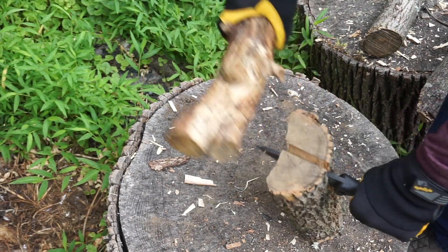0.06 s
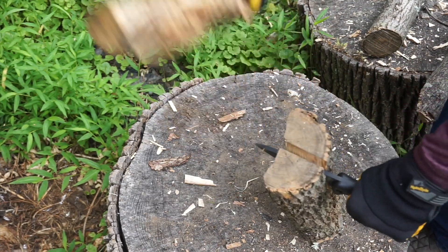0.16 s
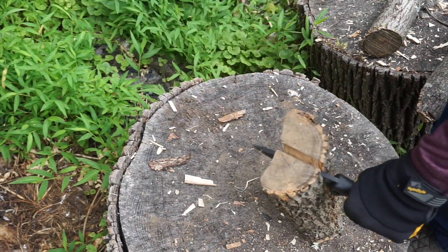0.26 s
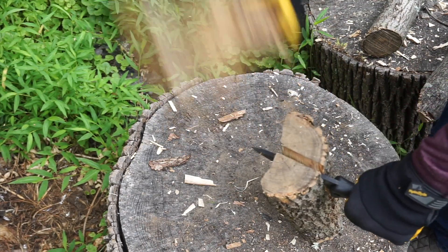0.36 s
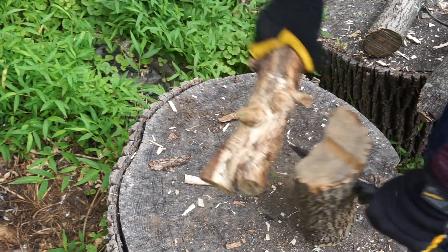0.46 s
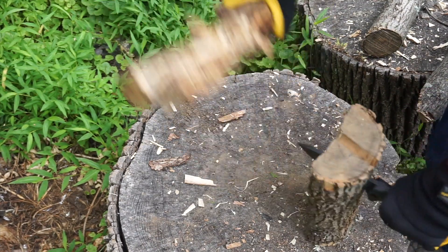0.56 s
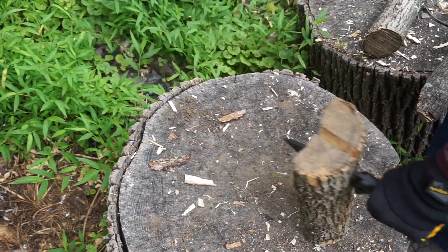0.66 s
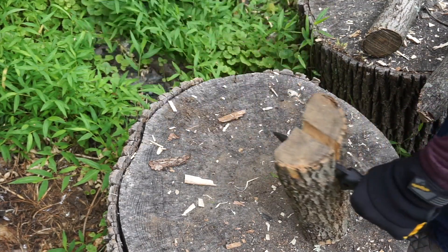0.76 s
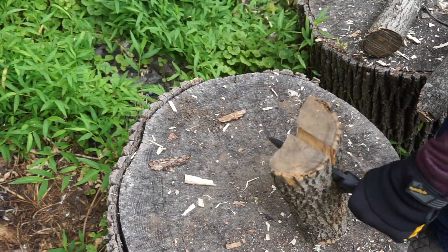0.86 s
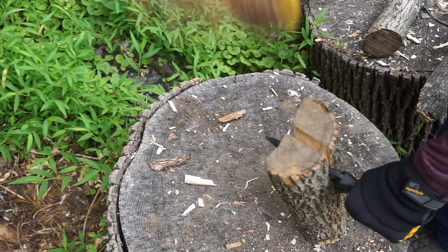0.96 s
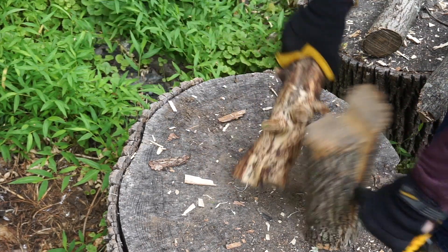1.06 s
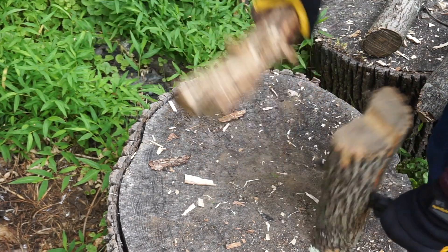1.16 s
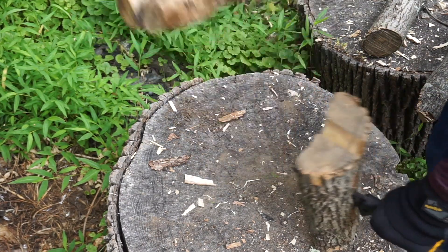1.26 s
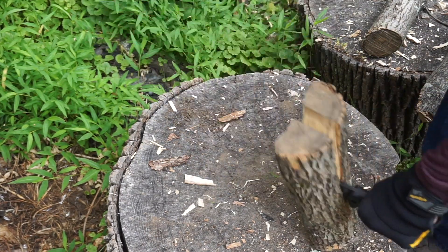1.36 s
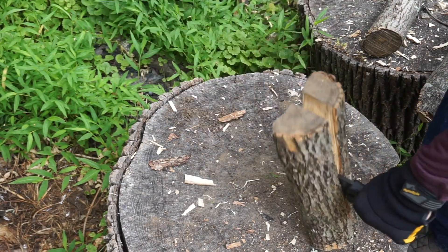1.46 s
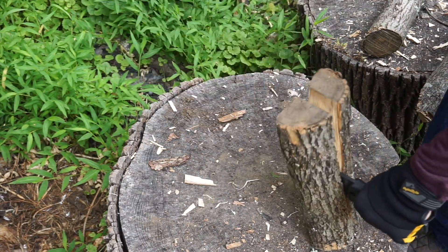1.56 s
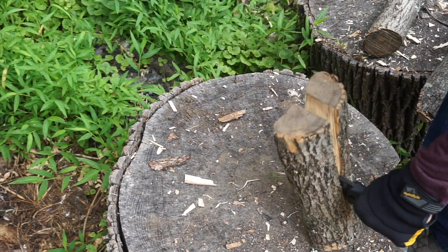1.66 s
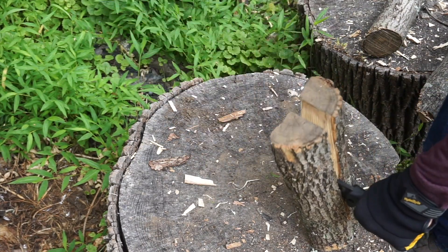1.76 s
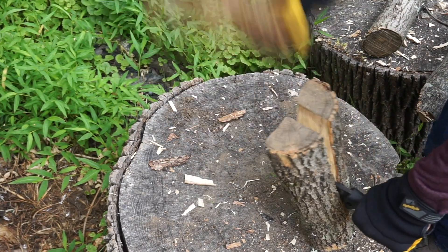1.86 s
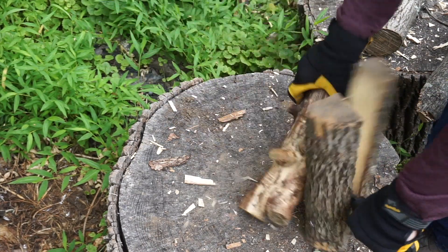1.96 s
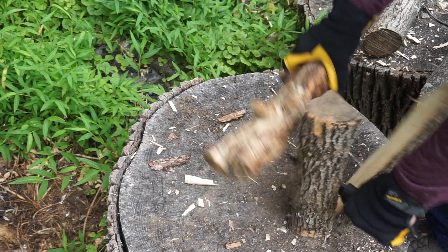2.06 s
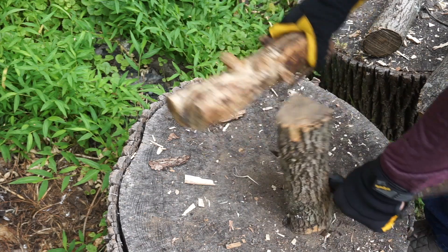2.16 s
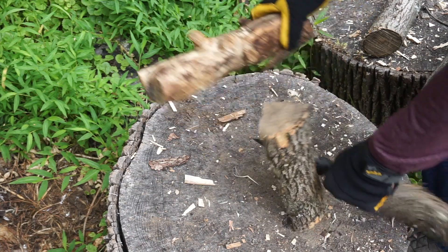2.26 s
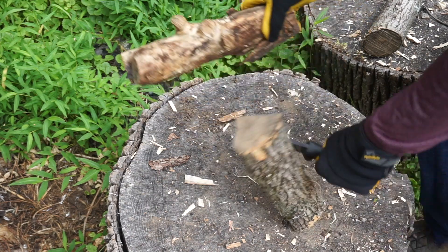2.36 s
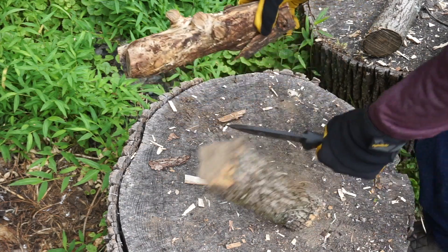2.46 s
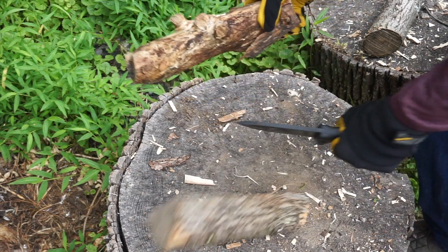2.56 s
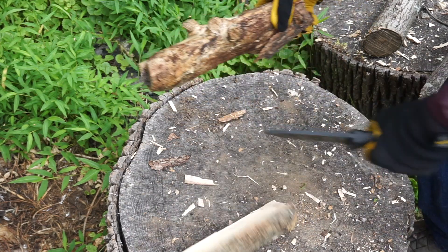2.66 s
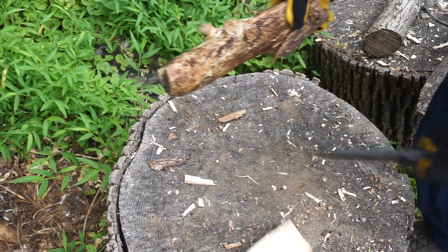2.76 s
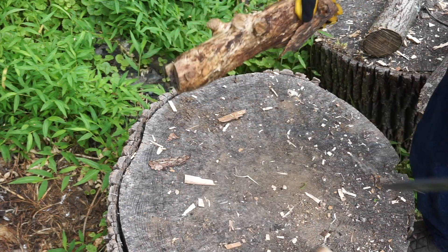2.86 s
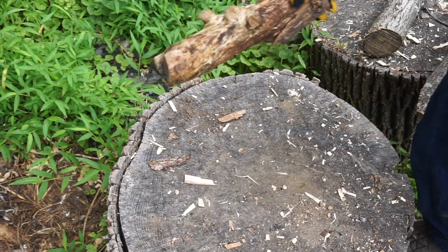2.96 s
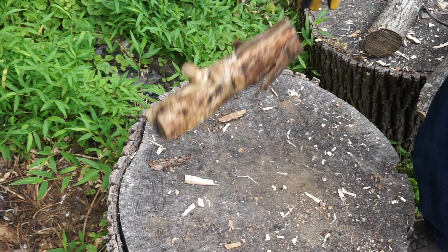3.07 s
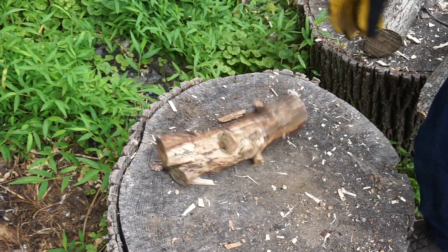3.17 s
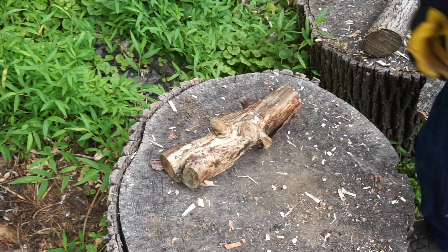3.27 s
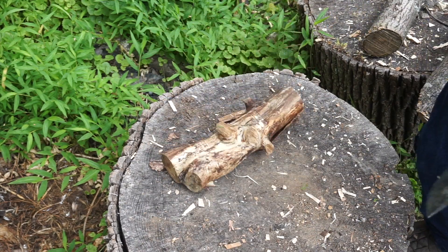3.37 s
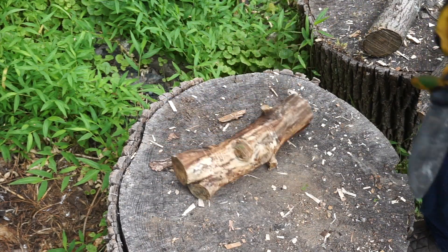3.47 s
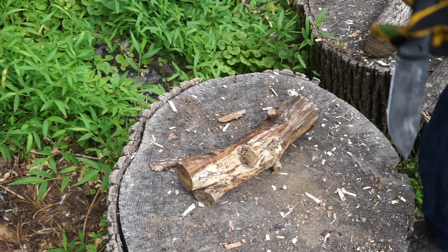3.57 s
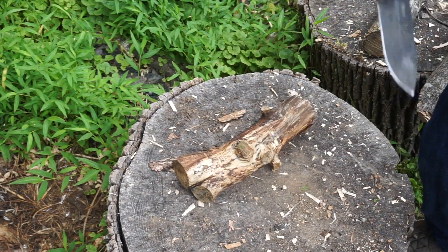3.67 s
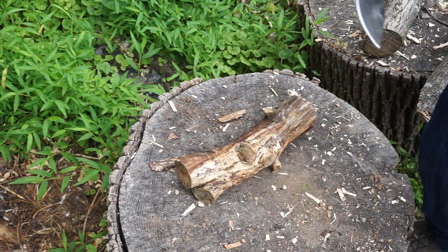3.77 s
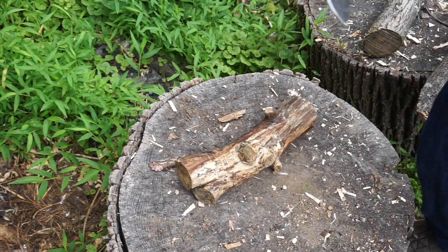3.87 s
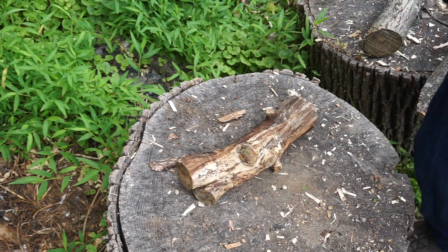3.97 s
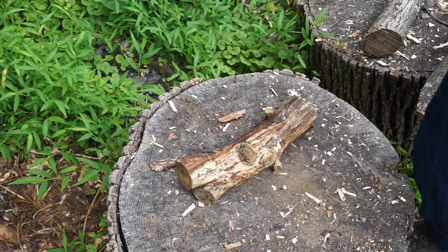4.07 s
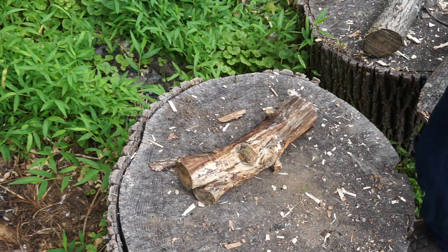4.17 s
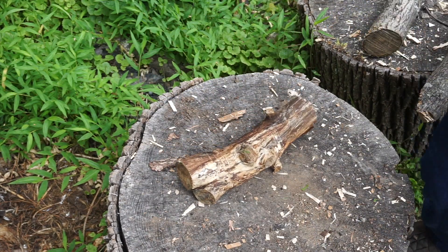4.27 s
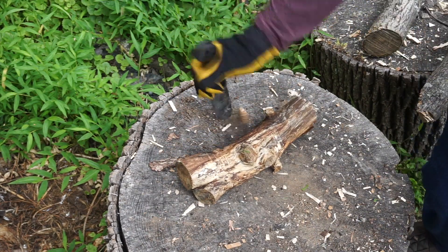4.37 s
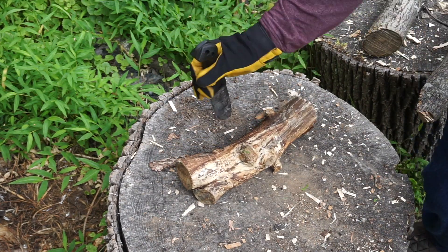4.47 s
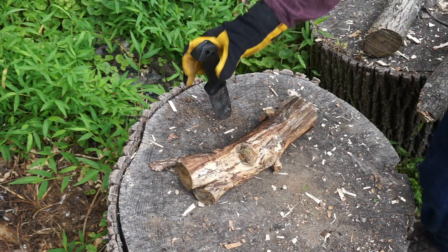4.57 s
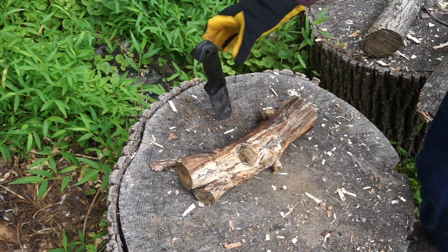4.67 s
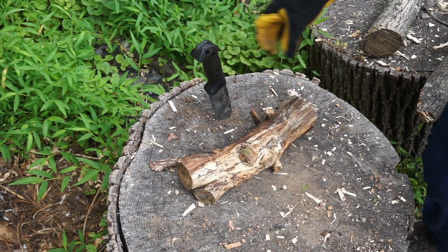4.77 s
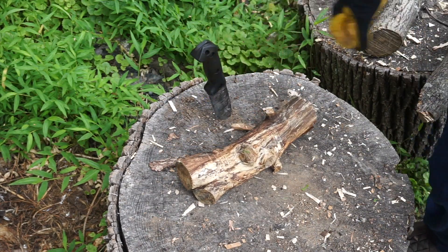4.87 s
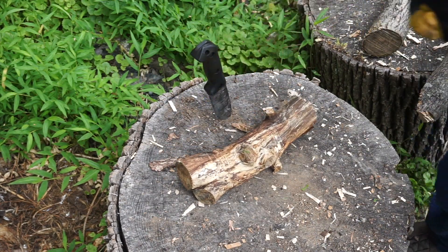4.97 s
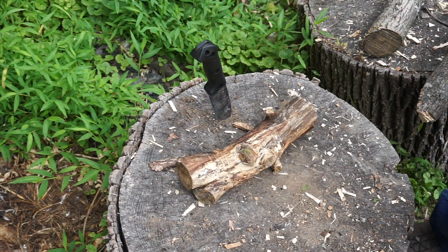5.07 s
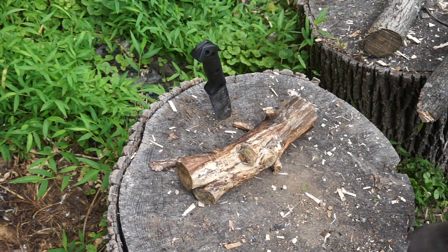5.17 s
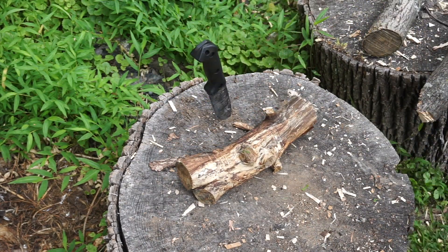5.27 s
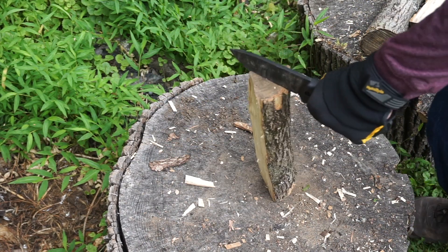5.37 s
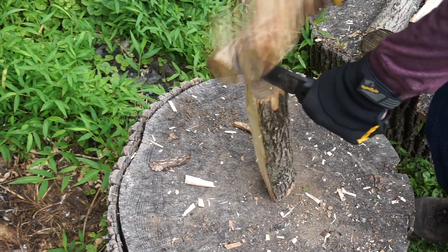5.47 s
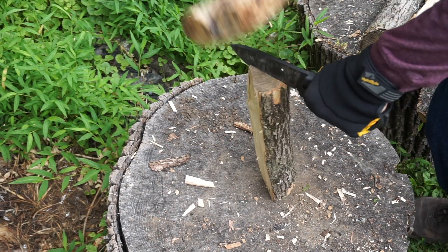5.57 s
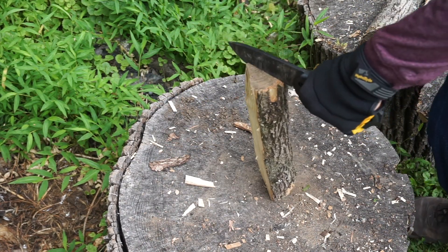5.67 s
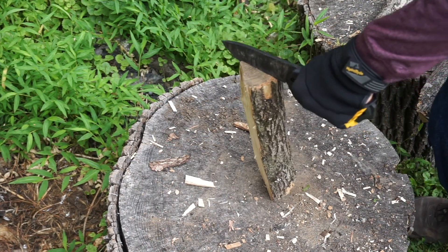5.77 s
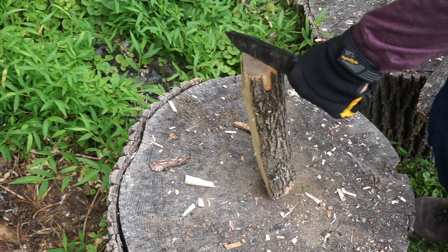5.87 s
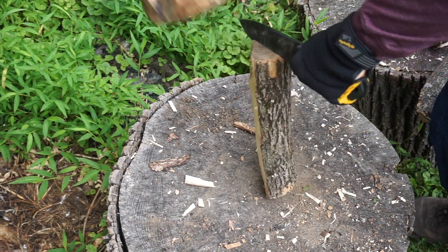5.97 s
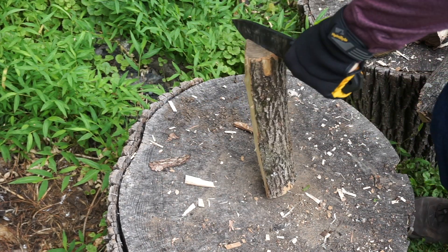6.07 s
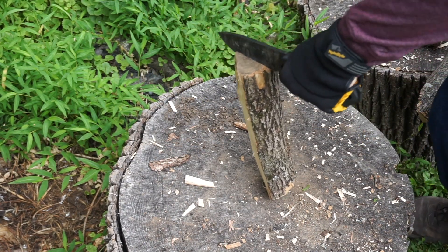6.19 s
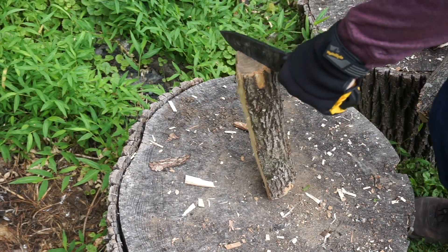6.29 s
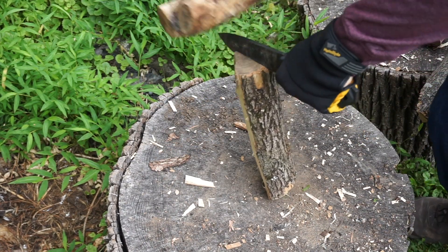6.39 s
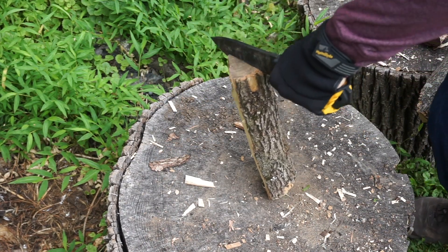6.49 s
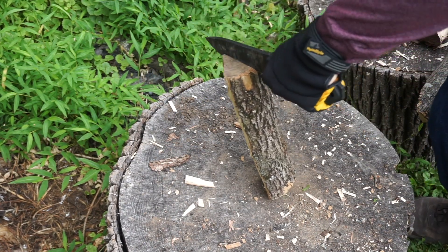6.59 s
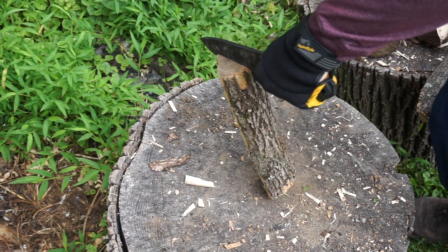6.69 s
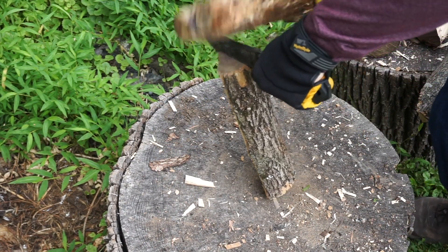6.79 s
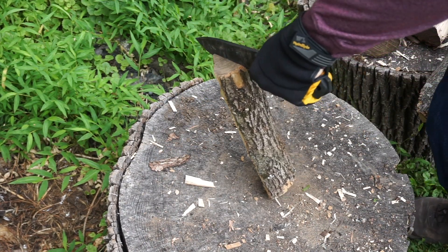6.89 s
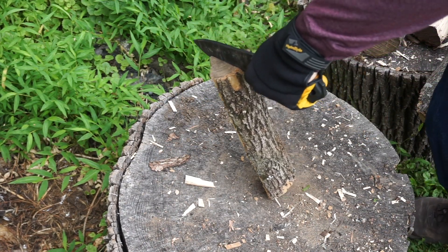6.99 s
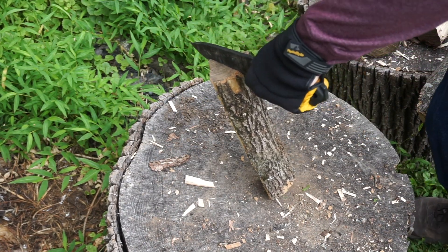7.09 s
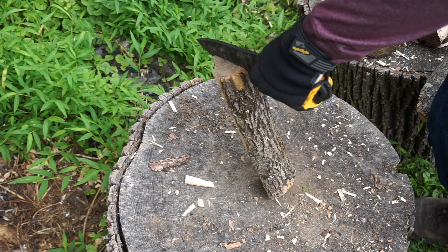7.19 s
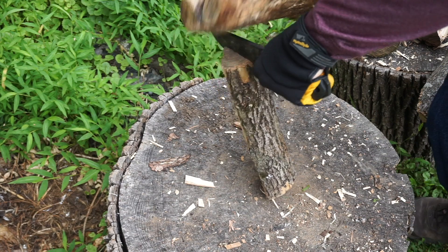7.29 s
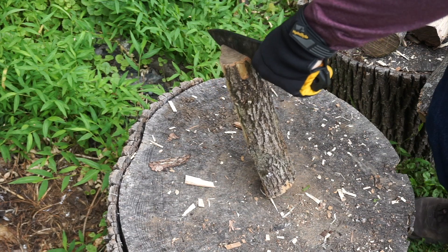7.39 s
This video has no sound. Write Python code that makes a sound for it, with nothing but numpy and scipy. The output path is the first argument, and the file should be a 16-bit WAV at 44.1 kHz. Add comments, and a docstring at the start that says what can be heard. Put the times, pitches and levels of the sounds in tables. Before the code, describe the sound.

Dry, loud wood knocks with snapping fibres split a log on a stump, echoing briefly among trees. Logs bounce, roll and are set down in an irregular clatter with fabric rustle. A lull with glove movement, one firm knife stab, another lull, then regular duller taps on a thin piece of wood. Very quiet far traffic and a barely audible bird whistle behind; close pickup, slightly dull top end, blows a little left.

```python
"""Firewood is split on a stump in a wood: a baton log strikes a knife, logs bounce, topple and are laid down,
the knife is stuck in the stump, then a thin billet is tapped. Each blow is a set of dying wood tones plus
snapping noise, and trees answer it after a gap with scattered echoes. Far traffic hums, gloves and sleeves
rustle and something squeaks hoarsely, all from shaped noise. A bird whistles faintly, as wavering sine tones."""
import sys
import numpy as np
from scipy import signal
from scipy.fft import rfft, irfft, next_fast_len
from scipy.io import wavfile
from scipy.ndimage import map_coordinates

SR = 44100
rng = np.random.default_rng(int(sys.argv[2]) if len(sys.argv) > 2 else 0)


def output_pcm(signal):
    """Save a mono or channel-first signal as 16-bit PCM at the path in sys.argv[1].

    Samples are clipped to [-1, 1] before scaling.
    """
    pcm = np.clip(np.atleast_2d(signal).T, -1, 1) * 32767
    wavfile.write(sys.argv[1], SR, np.round(pcm).astype(np.int16))


N = 328104  # length in samples

# far traffic over time: start_s, rumble_db, drone_db, tyres_db
ROAD_LEVELS = [(0, -52.5, -49, -52), (.8, -55.5, -52, -52.5), (2.2, -55.5, -52.5, -50.5),
               (3, -52.5, -49.5, -49.5), (4.8, -56.5, -52.5, -48), (5.6, -55.5, -58, -46.5),
               (6.3, -49.5, -53.5, -49.5), (7.44, -58, -51, -47)]
# tone colour of each traffic layer: frequency_hz, level_db_per_hz
RUMBLE_COLOUR = [(15, -5), (30, 5.5), (62, 15), (90, 15), (130, -64)]
DRONE_COLOUR = [(70, -23), (95, -11.5), (115, 1), (145, -10), (200, -42.5)]
TYRE_COLOUR = [(88, -26), (150, 0.5), (368, -7.5), (425, -7.5), (547, -6.5), (704, -4), (955, -4),
               (2430, -16.5), (3550, -21), (3950, -22), (11000, -29), (14300, -58), (22000, -120)]
# how alike left and right are, 1 = the same: frequency_hz, likeness (no unit)
LEFT_RIGHT_LIKENESS = [(60, 1), (170, 0.96), (500, 0.64), (1430, 0.44), (4100, 0.19), (11800, 0.029)]

# gloves and sleeves at work: start_s, rustle_db
CLOTH_LEVELS = [(0, -53.5), (.3, -66), (.55, -54), (1.3, -59), (1.85, -87), (2.0, -52), (2.2, -45),
                (2.3, -56.5), (2.6, -50), (3.15, -65), (3.35, -59), (3.6, -50), (3.85, -47.5), (4.1, -67.5),
                (4.5, -59), (5.0, -56), (5.5, -67), (7.44, -61)]
# tone colour of the fabric: frequency_hz, level_db_per_hz
RUSTLE_COLOUR = [(700, -63), (1500, 2.5), (3000, -0.5), (6000, -5.5), (10000, -1.5), (12000, -3)]
# a glove brushing past: peak_s, peak_db, half_length_s
GLOVE_BRUSHES = [(3.43, -43, 0.034), (3.921, -47.5, 0.026), (4.033, -50.5, 0.045), (5.208, -37, 0.016)]

# hard log, baton and stump contacts: start_s, ring_db, thud_db, knock_db, clack_db, crack_db,
# ring_hz, knock_hz, clack_hz, echo_gain_db
LOG_KNOCKS = [(0.4159, -27, -11, -19, -34, -23, 1900, 527, 4230, -27),
              (0.4201, -20, -15, -11, -27, -23.5, 2015, 694, 3370, -32),
              (0.4273, -30, -17.5, -26, -34, -22, 2220, 522, 4300, -31),
              (0.4376, -21.5, -45, -47, -26.5, -16.5, 2160, 1050, 2730, -26.5),
              (1.0221, -21.5, -17, -14.5, -16, -18, 1873, 560, 3930, -28),
              (1.0313, -17.5, -29, -14.5, -27, -16.5, 1725, 500, 3240, -27.5),
              (1.0467, -26, -30, -42, -25, -18, 1795, 961, 3020, -35),
              (1.115, -26, -33, -46, -14.5, -15, 1676, 660, 3060, -45),
              (1.2441, -30, -55, -47, -30, -19, 1767, 960, 3160, -34),
              (1.91, -26.5, -29.5, -13, -28, -15, 1574, 712, 3310, -22.5),
              (1.9346, -23, -24, -12, -31, -22.5, 1696, 542, 2900, -30),
              (1.9518, -20.5, -20, -13.5, -43, -23.5, 1800, 523, 2540, -23.5),
              (2.045, -31.5, -64, -56, -59, -20.5, 1590, 845, 4450, -28),
              (2.3066, -30.5, -41, -21, -29, -35, 2150, 1170, 2990, -36),
              (2.5244, -35, -29.5, -26.5, -22, -17.5, 2110, 775, 3910, -31),
              (2.6665, -21, -23, -13, -42, -17.5, 1790, 585, 2680, -29.5),
              (2.9712, -29, -14.5, -30, -22, -21, 1620, 506, 3650, -36),
              (3.1736, -35, -27, -15.5, -22, -22, 1660, 1355, 3500, -46),
              (3.1966, -30, -20, -18, -25, -19.5, 1860, 697, 2570, -40),
              (3.234, -18.5, -16.5, -15, -24, -25, 1700, 716, 3570, -31),
              (3.2371, -31, -21, -25, -26, -20, 1760, 657, 3500, -21),
              (3.4054, -56, -18.5, -28.5, -30.5, -28, 1790, 506, 3950, -35),
              (4.4123, -34, -46, -20, -19.5, -14, 1980, 1090, 2630, -42),
              (4.4167, -16.5, -15, -13.5, -21, -30, 1013, 511, 2080, -49)]
# wood tones in four groups, ring / thud / knock / clack: pitch, level_db, fade_by_60_db_s;
# thud pitch is in Hz, the others are multiples of the pitch of the contact
LOG_MODES = [
    [(0.998, 7.5, 0.05), (0.776, -2.5, 0.021), (1.4, -4, 0.032)],
    [(156.7, -7.5, 0.06), (223, -2, 0.03), (330.5, 1, 0.014)],
    [(.72, -2.5, 0.018), (1, 2, 0.022), (1.45, -1.5, 0.018), (1.9, -11, 0.044)],
    [(.88, -1, 0.023), (1, 10, 0.013), (1.2, -2, 0.018)],
]
BILLET_MODES = [
    [(1, 5.5, 0.024), (1.41, -2, 0.018)],
    [(147, -4, 0.043), (316, 4.5, 0.026)],
    [(.68, -12, 0.018), (1, -1.5, .015), (1.3, -17, 0.038), (1.8, -23.5, 0.02)],
    [(.82, -1.5, 0.015), (1, 3, 0.016)],
]
# tone colour of snapping fibres: frequency_hz, level_db
SPLINTER_COLOUR = [(1000, -3.5), (3000, 2.5), (6000, -0.5), (9000, -1), (12000, -3)]
# tone colour of the echoes from the trees: frequency_hz, level_db
TREE_COLOUR = [(150, -34), (400, -11), (800, -8.5), (2000, 5.5), (4000, 5), (11000, 3.5)]

# chips and bark ticking or scuffing: start_s, crack_db
CHIP_TICKS = [(0.4521, -30), (0.712, -33.5), (2.063, -33), (2.128, -31.5), (2.412, -37.5), (2.527, -25.5),
              (2.549, -28), (2.586, -33), (2.804, -42), (3.2254, -24), (3.2328, -15), (3.357, -27)]
# soft landings and rolls of wood: start_s, knock_db, thud_db
SOFT_THUDS = [(1.11, -24.5, -22), (1.205, -59, -42), (1.988, -36, -29), (2.276, -41, -32.5),
              (2.413, -40, -27.5), (2.557, -35, -31), (2.809, -46, -25.5), (2.85, -45, -30),
              (3.18, -35, -22.5), (3.261, -28.5, -25.5), (3.294, -37, -31), (4.75, -37, -44),
              (4.793, -36.5, -56)]

# the hoarse squeak over time: start_s, level_db
SQUEAK_LEVELS = [(0.562, -67), (.65, -46), (.71, -52), (.77, -66)]
# resonances of the squeak: centre_hz, width_hz, level_db
SQUEAK_PEAKS = [(2927, 70, -30), (3340, 71, -7), (3830, 360, -15)]

# taps on the thin billet; the dull ones are its rebounds on the stump:
# start_s, thud_db, knock_db, clack_db, echo_gain_db
BILLET_TAPS = [(5.5124, -19.5, -9.5, -34, -17.5), (5.555, -24, -31, -52, -23), (5.932, -17, -9, -32, -18.5),
               (6.3708, -19, -8.5, -25, -17), (6.8275, -17, -11, -35.5, -17.5),
               (7.3072, -18, -8.5, -27, -18), (7.352, -16.5, -19, -48, -13)]
# far whistles: start_s, end_s, pitch_hz, level_db
BIRD_CALLS = [(5.72, 5.92, 2870, -61), (6.076, 6.32, 2950, -63), (6.996, 7.315, 2910, -63)]

# contact time scales; pans are left minus right
KNOCK_MS, KNOCK_PAN_DB = 2.3, -2.5
TICK_MS, THUD_MS, SMALL_PAN_DB = 4.3, 2.7, -4.5
TAP_MS, TAP_PAN_DB = 2.55, -2
PAN_SCATTER_DB = 2.5  # random spread from contact to contact
SMALL_RING_HZ, SMALL_KNOCK_HZ, SMALL_CLACK_HZ = 1810, 656, 3450
TAP_RING_HZ, TAP_KNOCK_HZ, TAP_CLACK_HZ = 1704, 758, 3515
TICK_RING_DB, TICK_CLACK_DB = -14.5, -13.5  # relative to the crack
TAP_RING_DB, TAP_CRACK_DB = -8.5, -12.5  # relative to the knock
MUTE_DB = -120
ECHO_GAP_S, ECHO_RISE_S, ECHO_FADE_S, ECHO_LENGTH_S = 0.047, 0.012, 0.26, 0.55
ECHO_DB = 5.5  # gain shared by all echoes
ECHO_WAVER_DB = 1.4  # scale of the random loudness wavering of the echoes
ECHO_CRACK = 3.6  # weight of the crack against the wooden front
TOP_HZ = 11050  # where the treble starts to end


def amp(db):
    """Turn decibels into a plain multiplier."""
    return 10 ** (np.asarray(db) / 20)


def unit(x):
    """Scale a signal to an rms of 1."""
    return x / np.sqrt(np.mean(x ** 2) + 1e-20)


def along(points, hz):
    """Read a curve of (Hz, value) points on a log frequency axis."""
    f, v = np.transpose(points)
    return np.interp(np.log(hz + 1), np.log(f + 1), v)


def curves(rows):
    """Give one value per sample for each column after the time."""
    s, *columns = np.transpose(rows)
    return [np.interp(np.arange(N) / SR, s, column) for column in columns]


def inside(start, end):
    """Give 1 between two times and 0 outside, with soft ends."""
    t = np.arange(N) / SR
    return np.clip(np.minimum(t - start, end - t) / 0.012, 0, 1)


def wobble(rate):
    """Draw a smooth random curve through rate random points a second."""
    points = rng.standard_normal(int(N * rate / SR) + 4)
    return map_coordinates(points, [np.arange(N) * rate / SR])


def filtered(x, response):
    """Multiply the spectrum of x by a response that depends on frequency."""
    m = next_fast_len(x.shape[-1] + 4096)
    spectrum = rfft(x, m) * response(np.fft.rfftfreq(m, 1 / SR))
    return irfft(spectrum, m)[..., :x.shape[-1]]


def rush(pair, spectrum):
    """Colour two unrelated signals and mix them to a stereo pair with an rms of 1."""
    def mid_side(hz):
        turn = np.arccos(np.clip(along(LEFT_RIGHT_LIKENESS, hz), -1, 1)) / 2
        return amp(along(spectrum, hz)) * [np.cos(turn), np.sin(turn)]

    mid, side = filtered(pair, mid_side)
    return unit(np.array([mid + side, mid - side]))


def road():
    """Distant traffic: engine rumble, a drone and tyre hiss are noises that each drift on their own."""
    out = np.zeros((2, N))
    for db, colour in zip(curves(ROAD_LEVELS), (RUMBLE_COLOUR, DRONE_COLOUR, TYRE_COLOUR)):
        noise = rush(rng.standard_normal((2, N)), colour)
        out += amp(db + 0.62 * wobble(6)) * noise
    return out * amp([[-.4], [.4]])


def cloth():
    """Fabric rubs as dense noise grains in small clumps; now and then a glove brushes past."""
    t = np.arange(N) / SR
    level = amp(curves(CLOTH_LEVELS)[0])
    for s, db, half in GLOVE_BRUSHES:
        level += amp(db) * np.exp(-((t - s) / half) ** 2)
    clumps = amp(2.2 * wobble(420) + 1.4 * wobble(30))
    grains = rng.standard_normal((2, N)) * clumps
    return level * rush(grains, RUSTLE_COLOUR) * amp([[-1.5], [1.5]])


def splinter(t, contact):
    """Wood fibres snap: spiky noise swells during the contact and leaves a weak fading tail."""
    noise = rng.standard_normal((4, len(t)))
    # one noise shared by both sides plus one of its own for each, with very uneven loudness
    spikes = (noise[0] + 2.0 * noise[1:3]) * amp(4.14 * noise[3])
    spikes[:, round(.75 * contact * SR)] += 22  # one fibre bundle breaks at once
    burst = (t / contact) ** 2.24 * np.exp(-(t / contact) ** 2)
    tail = amp(-16 - 60 * t / 0.11) * (1 - np.exp(-t / contact))
    return (burst + tail) * unit(filtered(spikes, lambda hz: amp(along(SPLINTER_COLOUR, hz))))


def knock(modes, levels_db, ring_hz, knock_hz, clack_hz, pan_db, contact):
    """Wood tones are driven while the contact lasts, then die; fibres snap on top. Gives blow and front."""
    t = np.arange(SR // 8) / SR
    side = pan_db * np.array([[.5], [-.5]])
    # the phase is dragged about more while the surfaces touch
    rough = 0.77 + np.exp(-(t / (1.29 * contact)) ** 2)
    build_up = 1 - np.exp(-(t / (0.6 * contact)) ** 2)  # the force builds up
    scales = (ring_hz, 1, knock_hz, clack_hz)
    # the thud is nearly alike on both sides; the other parts lean more to one side
    sidedness = (1.0, 0.12, 0.84, 0.75)
    sound = np.zeros((2, len(t)))
    for group, db, scale, sided in zip(modes, levels_db, scales, sidedness):
        ring = 0
        for pitch, level, t60 in group:
            hz = pitch * scale
            slip = np.cumsum(rough * rng.standard_normal(len(t))) * np.sqrt(hz) * 0.002
            fade = amp(level - 60 * np.maximum(t - contact, 0) / t60)
            ring = ring + fade * np.sin(2 * np.pi * hz * t + slip)
        ring *= build_up
        sound += amp(db + sided * side) * ring / np.abs(ring).max()
    # the front is the quickly faded left side, before the crack is added
    front = sound[:1] * np.exp(-t / 0.0029)
    sound += amp(levels_db[4] + side) * splinter(t, contact)
    low_cut = signal.butter(3, 105, "high", fs=SR, output="sos")
    return signal.sosfilt(low_cut, sound), front


def tree_echo(front, crack_db, echo_db):
    """Trunks around scatter a blow: noise smears its front, then fades and loses treble."""
    t = np.arange(int(ECHO_LENGTH_S * SR)) / SR
    shape = amp(ECHO_DB) * np.exp(-(t / ECHO_FADE_S) ** 2)
    shape /= 1 + np.exp((ECHO_GAP_S - t) / ECHO_RISE_S * 2)
    scatter = rush(rng.standard_normal((2, len(t))), TREE_COLOUR)
    wooden = signal.fftconvolve(front, scatter, axes=1)[:, :len(t)]
    # the crack meets the same noise reversed in time, so its echo fills gaps in the wooden one
    scatter = wooden + ECHO_CRACK * amp(crack_db) * scatter[:, ::-1]
    treble = filtered(scatter, lambda hz: 1 / (1 + (4500 / (hz + 1)) ** 4))
    scatter -= treble * (1 - amp(-60 * t / 1.65))  # air and leaves take the treble of late echoes
    return amp(echo_db) * shape * scatter / np.sqrt(SR / 400)


def wood(contacts, modes, pan_db, ms):
    """Sum the contacts, each with a fresh scatter of echoes from the trunks around."""
    out, echoes = np.zeros((2, 2, N + SR))
    for s, levels_db, ring_hz, knock_hz, clack_hz, echo_db in contacts:
        side_db = pan_db + PAN_SCATTER_DB * rng.standard_normal()
        hit, front = knock(modes, levels_db, ring_hz, knock_hz, clack_hz, side_db, ms / 1000)
        echo = tree_echo(front, levels_db[4], echo_db)
        start = round(s * SR)
        out[:, start:][:, :hit.shape[1]] += hit
        echoes[:, start:][:, :echo.shape[1]] += echo
    waver = amp(ECHO_WAVER_DB * (wobble(70) + 0.62 * wobble(15)))
    return out[:, :N] + echoes[:, :N] * waver


def logs():
    """Each hard contact stirs the tones of a log in its own mix."""
    contacts = [(row[0], row[1:6], *row[6:]) for row in LOG_KNOCKS]
    return wood(contacts, LOG_MODES, KNOCK_PAN_DB, KNOCK_MS)


def small_contacts():
    """Chips stir only the high tones of a log and a crack, soft landings only the low tones; no echoes."""
    out = np.zeros((2, N + SR))
    hits = []
    for s, crack_db in CHIP_TICKS:
        levels_db = (crack_db + TICK_RING_DB, MUTE_DB, MUTE_DB, crack_db + TICK_CLACK_DB, crack_db)
        hits.append((s, levels_db, TICK_MS))
    for s, knock_db, thud_db in SOFT_THUDS:
        hits.append((s, (MUTE_DB, thud_db, knock_db, MUTE_DB, MUTE_DB), THUD_MS))
    for s, levels_db, ms in hits:
        side_db = SMALL_PAN_DB + PAN_SCATTER_DB * rng.standard_normal()
        hit, _ = knock(LOG_MODES, levels_db, SMALL_RING_HZ, SMALL_KNOCK_HZ, SMALL_CLACK_HZ,
                       side_db, ms / 1000)
        out[:, round(s * SR):][:, :hit.shape[1]] += hit
    return out[:, :N]


def squeak():
    """A hoarse squeak: rough noise passes through a few narrow resonances."""
    def peaks(f):
        return sum(amp(db) * 1j * f * width / (centre * centre - f * f + 1j * f * width)
                   for centre, width, db in SQUEAK_PEAKS)

    rough = rng.standard_normal(N) * amp(2.3 * wobble(81.3))
    tone = unit(filtered(rough, peaks))
    gate = inside(SQUEAK_LEVELS[0][0], SQUEAK_LEVELS[-1][0])
    return amp(curves(SQUEAK_LEVELS)[0]) * gate * tone * amp([[-1.2], [1.2]])


def billet():
    """Every tap rings the same thin billet; ring and crack follow the level of the knock."""
    contacts = []
    for s, thud_db, knock_db, clack_db, echo_db in BILLET_TAPS:
        levels_db = (knock_db + TAP_RING_DB, thud_db, knock_db, clack_db, knock_db + TAP_CRACK_DB)
        contacts.append((s, levels_db, TAP_RING_HZ, TAP_KNOCK_HZ, TAP_CLACK_HZ, echo_db))
    return wood(contacts, BILLET_MODES, TAP_PAN_DB, TAP_MS)


def bird():
    """A thin far whistle: sine tones whose loudness and phase flutter."""
    t = np.arange(N) / SR
    out = np.zeros(N)
    for start, end, hz, db in BIRD_CALLS:
        level = amp(db + 3.2 * wobble(22)) * inside(start, end)
        out += level * np.sin(2 * np.pi * hz * t + 0.98 * wobble(30))
    return out


def scene():
    """Add all the sounds together."""
    return road() + cloth() + logs() + small_contacts() + squeak() + billet() + bird()


def record(dry):
    """High peaks are rounded off; the treble ends steeply near 11 kHz."""
    rounded = dry / (1 + np.abs(dry / .62) ** 3) ** (1 / 3)
    edge = [(TOP_HZ, 0), (TOP_HZ + 200, -26), (12300, -34), (13000, -60), (16000, -70)]  # Hz, dB
    return filtered(rounded, lambda hz: amp(along(edge, hz)))


dry = scene()
out = record(dry)
output_pcm(out)
```